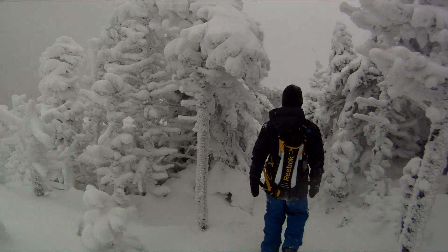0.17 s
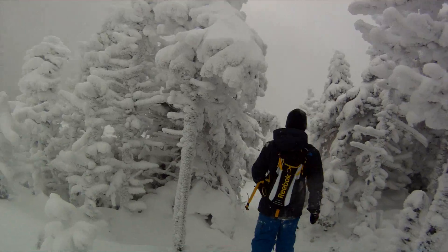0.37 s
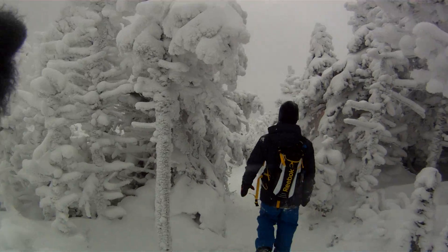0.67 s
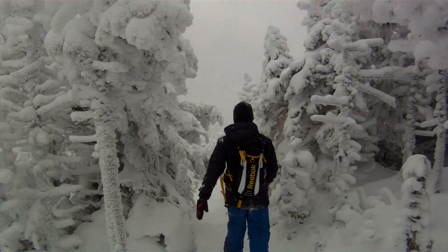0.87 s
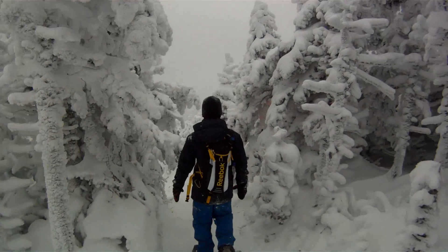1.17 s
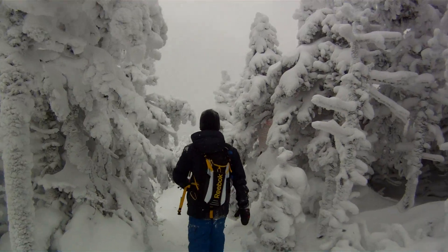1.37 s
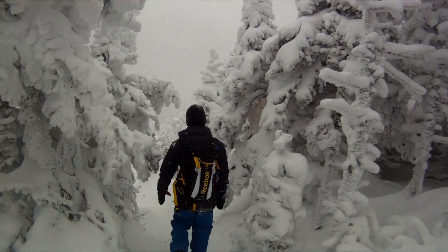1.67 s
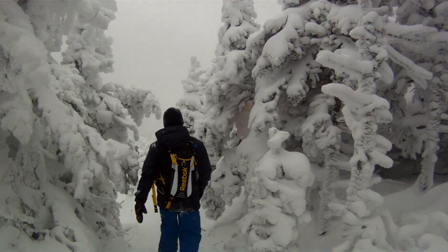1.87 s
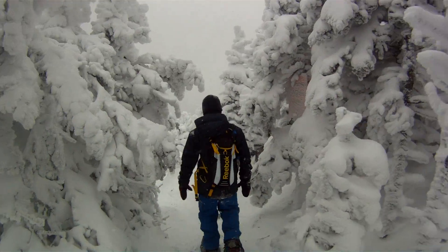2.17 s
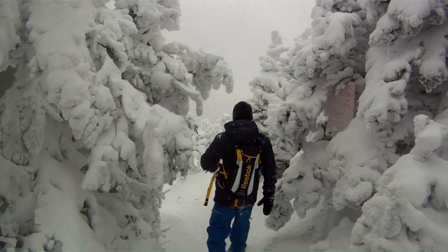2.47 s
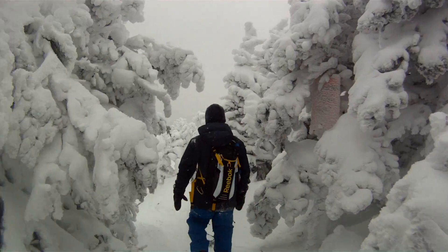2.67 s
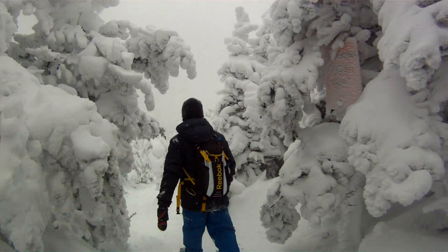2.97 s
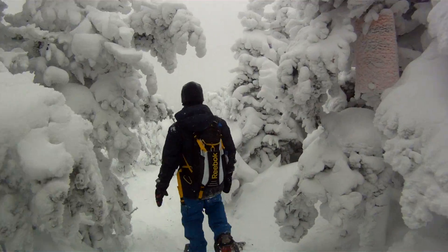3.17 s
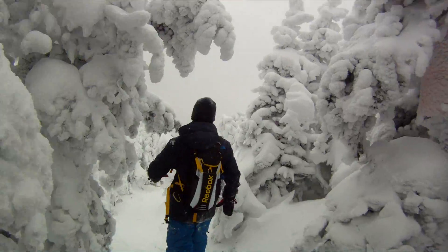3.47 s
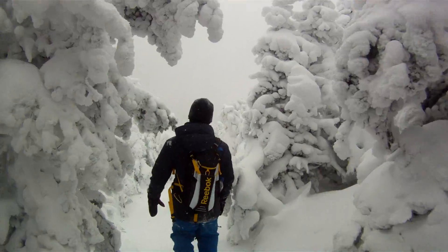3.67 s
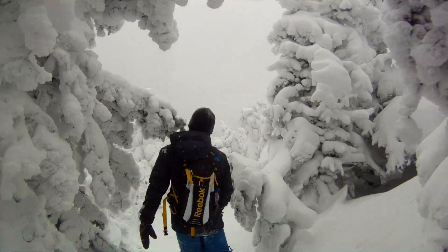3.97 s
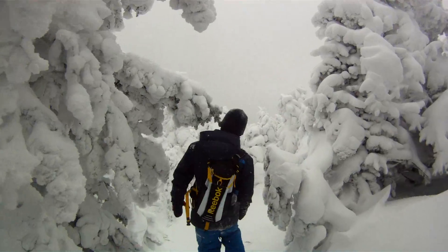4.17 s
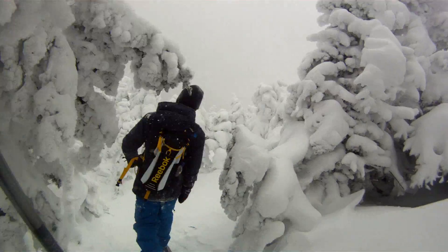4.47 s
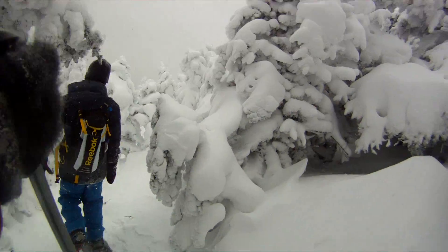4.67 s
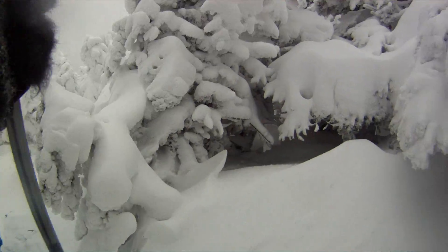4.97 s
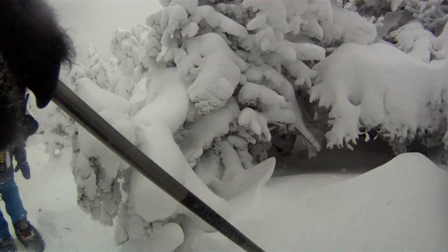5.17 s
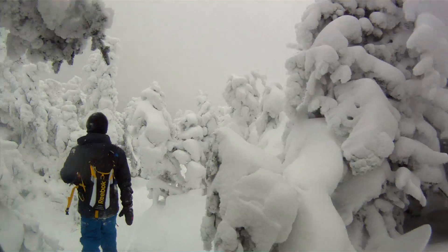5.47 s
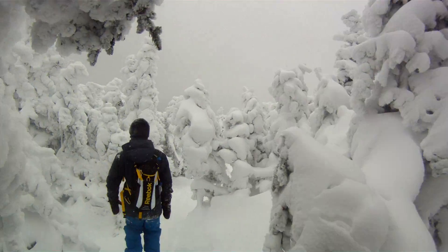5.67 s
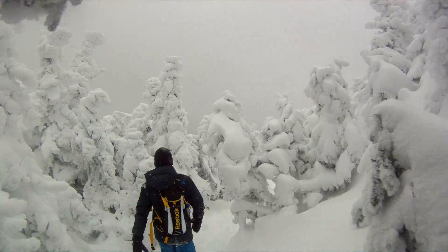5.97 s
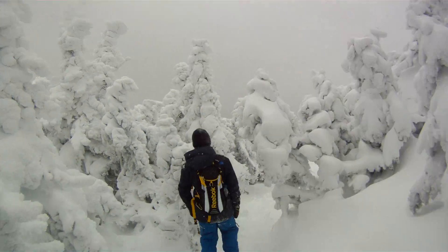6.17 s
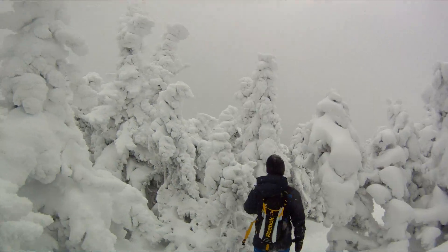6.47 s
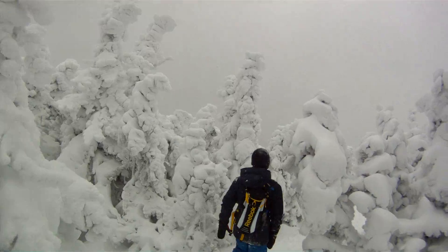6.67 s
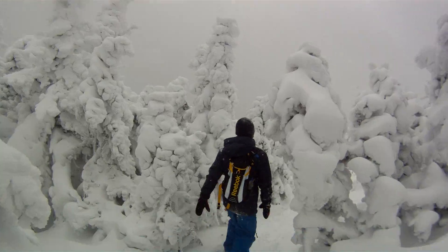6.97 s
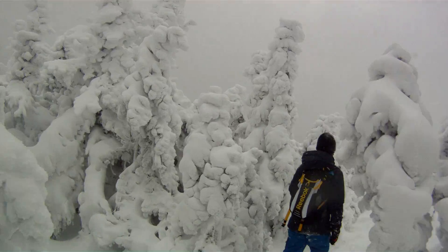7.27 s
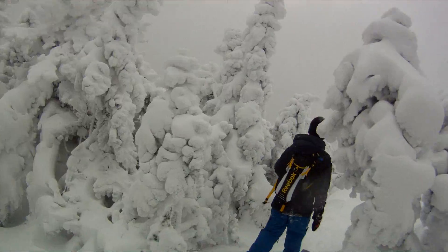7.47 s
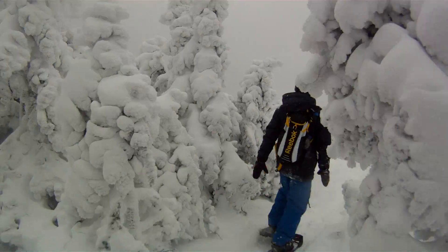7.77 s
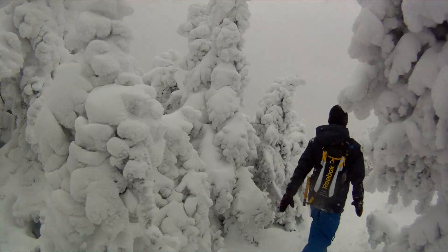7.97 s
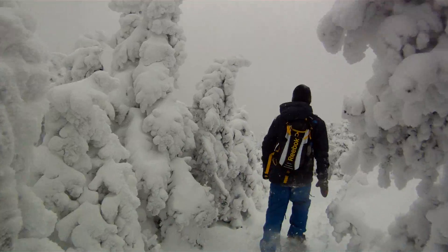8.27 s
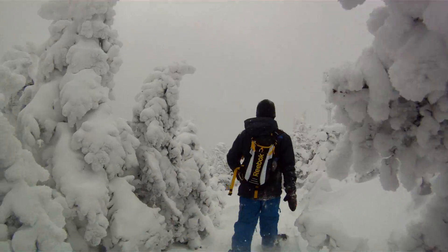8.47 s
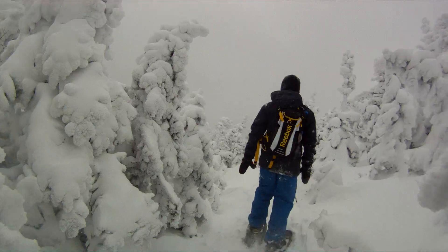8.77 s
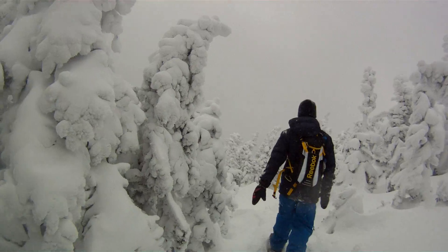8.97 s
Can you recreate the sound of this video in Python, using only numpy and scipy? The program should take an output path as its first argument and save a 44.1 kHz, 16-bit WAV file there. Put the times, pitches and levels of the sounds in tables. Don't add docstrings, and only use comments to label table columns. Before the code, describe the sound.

Outdoors on a snowy trail, a walker's snowshoes crush snow, break crusts and scrape between footfalls. A loose buckle rattles quickly early on, a hard crack comes near the middle, a sleeve rubs low, and straps squeak faintly. Near the end, knocks and crunches bunch up. The sound is mono, close and dry, coloured by a plastic case, with gritty low-quality treble and low body rumble.

```python
import sys
import numpy as np
from scipy import signal
from scipy.fft import rfft, irfft, next_fast_len
from scipy.io import wavfile
from scipy.ndimage import uniform_filter1d

SR = 44100
rng = np.random.default_rng(int(sys.argv[2]) if len(sys.argv) > 2 else 0)


def unload_wav(signal):
    wavfile.write(
        sys.argv[1],
        SR,
        np.round(np.clip(np.atleast_2d(signal).T, -1, 1) * 32767).astype(np.int16),
    )


def linear_from_db(decibels):
    return 10 ** (np.asarray(decibels, float) / 20)


N = 401744


def evened(x):
    return x / np.sqrt(np.mean(x ** 2) + 1e-20)


def peaked(x):
    return x / (abs(x).max() + 1e-12)


def colour(x, points):
    size = next_fast_len(len(x))
    point_hz, point_db = np.transpose(points)
    hz = np.fft.rfftfreq(size, 1 / SR)
    gain = linear_from_db(np.interp(np.log(hz + 1), np.log(point_hz + 1), point_db))
    return irfft(rfft(x, size) * gain, size)[:len(x)]


def hump(hz, width):
    return [(hz / (1 + width), -20), (hz, 0), (hz * (1 + width), -20)]


def add(mix, start_s, sound):
    part = mix[round(start_s * SR):][:len(sound)]
    part += sound[:len(part)]


def lumps(length_s, depth_db):
    size = max(round(length_s * SR), 2)
    smooth = uniform_filter1d(uniform_filter1d(rng.standard_normal(N), size), size)
    return linear_from_db(depth_db * evened(smooth))


def grains(per_s, spread_db):
    chance, side, luck = rng.random((3, N))
    size = linear_from_db(-spread_db * np.log(luck + 0.029))
    return (chance < per_s / SR) * np.sign(side - 0.5) * size


def swells(rows, column, shape):
    rest_db, rise_db, fall_db, hold = shape
    table = np.array(rows)
    t = np.arange(0, N + 64, 64) / SR
    u = (t - table[:, :1]) / np.maximum(table[:, 1:2], 0.02)
    drop_db = np.maximum(np.maximum(-rise_db * u, fall_db * (u - hold)), 0)
    db = table[:, column, None] - drop_db
    gain = np.sqrt(linear_from_db(rest_db) ** 2 + (linear_from_db(db) ** 2).sum(0))
    return np.interp(np.arange(N) / SR, t, gain)


def bursts(rows, level_db, stretch, rise, rough):
    out = np.zeros(N)
    for (start_s, db, length_s, hz), noise in zip(rows, rng.standard_normal((len(rows), 9000))):
        t = np.arange(min(round(stretch * length_s * SR), 9000)) / SR
        u = t / t[-1]
        tone = np.sqrt(2) * np.sin(2 * np.pi * hz * t + 3 * noise[0])
        grit = evened(colour(noise, hump(hz, 0.63)))[:len(t)]
        sound = peaked(u ** rise * (1 - u) ** 2.6 * (tone + rough * grit))
        add(out, start_s - 0.15 * length_s, linear_from_db(db + level_db) * sound)
    return out


def ring(modes, size=1024):
    t = np.arange(size) / SR
    rows = []
    for k, (hz, width_hz, db) in enumerate(modes):
        decay = width_hz * np.exp(-np.pi * width_hz * t)
        rows.append((-1) ** k * linear_from_db(db) * decay * np.sin(2 * np.pi * hz * t))
    return np.array(rows) * 2 * np.pi / SR


# pitch_hz [Hz], width_hz [Hz], level_db [dB]
HOUSING_MODES = [(1168, 130, -8.5), (1485, 120, -1), (1905, 183, -2), (2120, 247, -4), (2371, 104, -5.5),
                 (2753, 410, -11), (3467, 160, -7.5), (3910, 700, -15.5)]
# pitch_hz [Hz], level_db [dB]
HOUSING_LEAK = [(100, -32), (500, -16.5), (1000, -17), (2500, -29.5), (4000, -31), (5400, -22.5),
                (5900, -27)]


def housed(x):
    return signal.oaconvolve(x, ring(HOUSING_MODES).sum(0))[:len(x)] + colour(x, HOUSING_LEAK)


# top_s [s], length_s [s], crush_db [dB], hiss_db [dB]
FOOTFALLS = [(0.07, 0.24, -45.5, -51.5), (0.46, 0.15, -46, -51.5), (0.99, 0.081, -40.5, -47.5),
             (1.55, 0.14, -44.5, -49.5), (2.03, 0.13, -42.5, -46.5), (2.56, 0.13, -42.5, -50.5),
             (3.11, 0.1, -43, -45), (3.55, 0.13, -43, -50), (4.12, 0.1, -42, -44),
             (4.54, 0.081, -44.5, -50.5), (4.93, 0.17, -40.5, -61), (5.59, 0.11, -43.5, -51),
             (5.99, 0.12, -42.5, -52.5), (6.66, 0.18, -47, -60), (7.11, 0.095, -43.5, -55),
             (7.5, 0.11, -42.5, -48), (7.95, 0.25, -44.5, -54.5), (8.18, 0.079, -39, -42),
             (8.59, 0.19, -45, -55.5)]
# top_s [s], length_s [s], crush_db [dB], hiss_db [dB]
DRAGS = [(0.63, 0.1, -46.5, -50.5), (1.12, 0.35, -49, -51), (1.4, 0.28, -48, -74),
         (1.71, 0.062, -52, -50.5), (2.44, 0.036, -47, -54), (2.8, 0.3, -52.5, -61),
         (3.02, 0.085, -44.5, -48.5), (3.35, 0.044, -50, -56), (3.73, 0.18, -45, -51),
         (3.978, 0.17, -46.5, -52), (4.3, 0.061, -45.5, -47), (4.72, 0.22, -40.5, -69),
         (5.32, 0.085, -45, -71), (5.43, 0.21, -45, -71), (6.167, 0.064, -40.5, -52), (6.4, 0.48, -53, -57),
         (6.82, 0.83, -48.5, -66), (7.73, 0.15, -51, -57), (8.29, 0.061, -41.5, -61),
         (8.83, 0.14, -47, -60)]
# rest_db [dB], rise_db and fall_db [dB a length], hold [lengths]
CRUSH_SWELL = (-54.5, 12.5, 6.5, -0.12)
HISS_SWELL = (-65, 18, 10, -0.1)
# pitch_hz [Hz], level_db [dB]
HISS_COLOUR = [(1800, -52), (2600, -14), (3500, -29), (4800, 17.5), (5600, 16), (6200, -16)]


def snow():
    crush = swells(FOOTFALLS + DRAGS, column=2, shape=CRUSH_SWELL)
    hiss = swells(FOOTFALLS + DRAGS, column=3, shape=HISS_SWELL)
    load = evened(crush) ** 0.5
    clumps = lumps(0.009, 2.1)

    breaks = np.zeros(N)
    for hz, db in [(1250, -2.0), (1550, -2.0), (1950, -1.5), (2400, -4.0)]:
        breaks += linear_from_db(db) * colour(evened(grains(700, 2.95)) * lumps(0.0043, 2.54), hump(hz, 0.94))
    wash = evened(colour(rng.standard_normal(N), [(2200, -7), (3200, -11.5)]))
    breaks = load * clumps * evened(breaks) + 0.5 * clumps ** 0.45 * wash

    fizz = np.zeros(N)
    for hz in (2940, 3750, 4650, 4970):
        fizz += colour(evened(grains(900, 7.0)) * lumps(0.016, 1.8), hump(hz, 0.46))
    fizz = evened(fizz) + 0.49 * evened(colour(rng.standard_normal(N), HISS_COLOUR))

    crackle = colour(grains(170, 4.6) * clumps, [(500, -21), (1400, -10), (2800, -3.0), (5500, 9.0)])
    out = linear_from_db(-2.5) * crush * evened(housed(breaks))
    out += linear_from_db(-2.0) * hiss * evened(housed(fizz * clumps))
    return out + linear_from_db(-5.5) * hiss * load * evened(housed(crackle))


# first_db [dB], lost_db [dB a tap], rebound_db [dB], length_s [s], hiss_db [dB]
BUCKLE = (-26, -1.23, -6, 0, -25)


def buckle_taps():
    first_s, gap_s, rebound_s = 2.7095, 0.0366, 0.0155
    first_db, lost_db, rebound_db, length_s, hiss_db = BUCKLE
    taps = []
    for k in range(7):
        for j in range(2):
            start_s = first_s + k * gap_s + j * rebound_s
            taps.append((start_s, first_db + k * lost_db + j * rebound_db, length_s, hiss_db))
    return taps


# start_s [s], peak_db [dB], length_s [s], hiss_db [dB against the peak]
THICK_CRUSTS = [(0.572, -32, 0.008, -7), (0.848, -32, 0.015, -13), (0.956, -29.5, 0.018, -11),
                (1.405, -26.5, 0.018, -25), (1.461, -26, 0.018, -26), (1.471, -23, 0.039, -24),
                (1.903, -29, 0.0093, -21), (2.07, -25.5, 0.0054, -13), (2.44, -36.5, 0.0079, -0.5),
                (2.57, -26, 0.013, -13), (3.006, -27, 0.011, -14), (3.159, -28, 0.014, -14),
                (3.463, -32, 0.014, -17), (3.545, -25.5, 0.015, -9), (3.938, -12.5, 0.021, -15),
                (3.976, -25.5, 0.0098, -9), (4.184, -22, 0.0077, -17), (4.214, -20.5, 0.0067, -16),
                (4.753, -28, 0.029, -14), (5.051, -22.5, 0.0035, -15), (5.884, -34.5, 0.022, -17),
                (6.217, -29.5, 0.011, -16), (7.521, -28, 0.0024, -6), (7.933, -27, 0.027, -13),
                (8.794, -28.5, 0.0047, -9)]
THIN_CRUSTS = [(1.379, -32.5, 0.01, -11), (1.981, -28, 0.011, -7), (2.04, -35, 0.0065, -8),
               (2.523, -28, 0.0036, -6.5), (2.691, -25, 0.011, -22), (3.517, -32.5, 0.026, -8.5),
               (3.955, -22, 0.0093, -19), (4.047, -26.5, 0.0085, -8), (4.29, -30, 0.04, -9),
               (4.813, -34, .0085, -28), (4.974, -26, 0.063, -18), (5.555, -28, 0.0091, -20),
               (6.674, -27, 0.039, -24), (6.851, -28.5, 0.014, -19), (7.475, -26, 0.031, -7),
               (7.721, -34, 0.016, -35), (7.889, -29.5, 0.019, -14.5), (8.145, -25, .0049, -7.5),
               (8.179, -26, 0.013, -8), (8.2085, -29, 0.005, -20), (8.242, -37, .0098, -19),
               (8.276, -20.5, 0.029, -20), (8.461, -26.5, 0.0089, -40), (8.648, -28.5, 0.0067, -10),
               (8.98, -34.5, 0.014, -9.5)]
ICY_FLAKES = [
    (1.549, -29.5, 0.031, -11),
    (1.601, -33, 0.034, -6),
    (4.129, -29, 0.0077, -10),
    (5.97, -19.5, 0.025, -13),
    (6.02, -27, 0.014, -28),
    (6.43, -29, 0.023, -19),
    (6.809, -31, 0.029, -9),
    (7.154, -37.5, .036, -9),
    (8.381, -28.5, 0.046, -19),
]
CLODS = [
    (8.303, -20.5, 0.017, -21),
]


def crunches():
    kinds = [(1530, THICK_CRUSTS), (1910, THIN_CRUSTS), (2460, ICY_FLAKES),
             (1710, buckle_taps()), (1120, CLODS)]
    rows = [(hz, *row) for hz, table in kinds for row in table]
    out, t = np.zeros(N), np.arange(4000) / SR
    noise = rng.standard_normal((len(rows), 2, 4000))
    for (hz, start_s, db, length_s, hiss_db), (grit, air) in zip(rows, noise):
        u = t / max(length_s, 0.001)
        shape = (1 - np.exp(-u / 0.15)) * np.exp(-3 * u)
        body = colour(grit, hump(hz, 0.54)) * shape
        fizz_hz = 3200 * (1 + 0.18 * np.tanh(air[0]))
        fizz = colour(air, hump(fizz_hz, 1.0)) * shape
        sound = peaked(housed(body)) + linear_from_db(hiss_db + 7.5) * peaked(housed(fizz))
        add(out, start_s - 0.0016, linear_from_db(db - 5.0) * sound)
    return out


# start_s [s], peak_db [dB], length_s [s], pitch_hz [Hz]
SNAPS = [(0.0752, -34, 0.022, 1520), (0.4682, -34.5, 0.019, 1505), (0.785, -40, 0.012, 1450),
         (0.9571, -30.5, 0.014, 1910), (1.4832, -33, 0.015, 1980), (1.9762, -32, 0.018, 1964),
         (2.038, -32, 0.0062, 1970), (2.6925, -30, 0.015, 1540), (3.5645, -34, 0.0063, 1510),
         (3.9587, -23, 0.0063, 2060), (3.9744, -29, 0.0073, 2030), (3.9929, -34, 0.019, 1480),
         (4.1404, -31, 0.028, 2056), (4.6585, -34, 0.0087, 1870), (4.708, -34, 0.0091, 1300),
         (4.7186, -33, 0.035, 1896), (4.7554, -35, 0.011, 1490), (4.863, -33, 0.014, 1920),
         (4.8915, -34, 0.007, 1960), (4.9188, -31, 0.0073, 1950), (4.945, -31, 0.032, 1910),
         (4.977, -26, 0.0076, 1910), (5.0495, -25, 0.0091, 2024), (5.3106, -33, 0.0039, 1880),
         (5.3267, -35, 0.017, 1920), (5.5819, -33, 0.0074, 1940), (5.9702, -35, 0.022, 1520),
         (5.9869, -26.5, 0.0081, 1500), (6.1335, -29, 0.009, 1510), (6.2211, -31, 0.0084, 1480),
         (6.6765, -30, 0.027, 1948), (7.1304, -31, 0.008, 1910), (7.5196, -30, 0.009, 1940),
         (7.7224, -29, 0.019, 2000), (7.9336, -31, 0.017, 1520), (8.1601, -32, 0.014, 2000),
         (8.1787, -35, 0.014, 1430), (8.2039, -35, 0.02, 1520), (8.2397, -31, 0.007, 1400),
         (8.2835, -28, 0.012, 1490), (8.295, -35, 0.007, 1890), (8.3707, -32, 0.01, 2020)]
# start_s [s], peak_db [dB], length_s [s], pitch_hz [Hz]
CHIPS = [(0.3001, -33, 0.01, 2660), (0.57, -38, 0.014, 2500), (1.5452, -35, 0.01, 2700),
         (2.0298, -38, 0.008, 3430), (2.5211, -38, 0.01, 4890), (2.5682, -36, 0.017, 2560),
         (3.5225, -34, 0.013, 3380), (3.5441, -35, 0.009, 2420), (3.7128, -31, 0.014, 2710),
         (3.7237, -35, 0.007, 2700), (4.0896, -33, 0.0085, 3380), (4.0957, -31, 0.01, 2600),
         (4.1442, -35, 0.014, 3610), (4.2091, -34, 0.011, 2730), (4.7544, -30, 0.007, 2610),
         (4.9699, -33, 0.02, 2580), (6.004, -32, 0.01, 2650), (6.0368, -36, 0.013, 2600),
         (6.0519, -34, 0.0077, 2630), (6.0827, -33, 0.018, 2470), (6.1541, -34, 0.009, 2600),
         (6.2202, -30.5, 0.009, 2660), (6.359, -35.5, 0.012, 2470), (7.4745, -32, 0.011, 3600),
         (7.506, -38, 0.012, 3430), (7.5276, -28, 0.012, 2600), (7.9332, -29, 0.0042, 2610),
         (8.1656, -30, 0.014, 3510), (8.2143, -24, 0.0073, 2990), (8.2776, -34, 0.0055, 2590),
         (8.8454, -36, 0.023, 3487)]


def crystals():
    snaps = bursts(SNAPS, -2.0, stretch=1.13, rise=1.0, rough=0.68)
    return snaps + bursts(CHIPS, -1.2, stretch=1.26, rise=0.96, rough=1.0)


# start_s [s], main_db [dB], then against it thud_db, second_db, fourth_db [dB]
KNOCKS = [(0.2266, -18.5, -18.5, 1.5, -5), (0.3025, -23, -10.5, 0.5, -7.5), (3.013, -30.5, -16, 7, -6),
          (3.1085, -21, -16, 4.5, -29), (3.5741, -27.5, -11, -1, -9), (3.6392, -19.5, -17, 4.5, -4),
          (4.0985, -29, -9, 2, -25), (4.5383, -16, -15, -1, -8), (4.6382, -21, -15, 4, -3.5),
          (6.156, -31.5, -42, 8, -5), (6.768, -15.5, -12.5, -14, -15), (7.53, -26.5, -12.5, -2, -12),
          (7.661, -21, -9.5, -10, -8.5), (7.736, -36.5, -5, -10, -1.5), (7.9543, -14, -14, -11, -22),
          (8.2669, -23.5, -9.5, 5.5, -11), (8.3072, -32, -11, 2, -25), (8.3601, -13.5, -10.5, -10.5, -22),
          (8.5981, -12, -13, -3, -13)]
# main pitch_hz [Hz], third_db [dB against the main mode]
LANDINGS = [(1425, -8.5), (1430, -7), (1470, -8), (1425, -18), (1455, -12), (1472, -13), (1440, -12),
            (1475, -12), (1470, -12), (1455, -10), (1483, -11), (1450, -7), (1430, -25), (1460, -16),
            (1505, -11), (1420, -18), (1460, -12), (1426, -14), (1433, -13)]
# pitch_hz [Hz], width_hz [Hz], level_db [dB]
SHELL_MODES = [(270, 260, 0), (540, 320, -1)]
# pitch_hz [Hz], top_s [s until the swell tops]
AIR_MODES = [(1455, 0.0025), (1925, 0.0014), (2700, 0.0014), (3460, 0.0014), (4070, 0.0012)]


def knocks():
    out, t = np.zeros(N), np.arange(1024) / SR
    push = -np.sin(np.pi * np.clip(t / 0.00056, 0, 1)) ** 2
    shell = np.zeros(1024)
    for hz, width_hz, db in SHELL_MODES:
        shell += linear_from_db(db) * np.exp(-np.pi * width_hz * t) * np.cos(2 * np.pi * hz * t)
    thud = peaked(np.convolve(push, shell)[:1024])

    mode_hz, top_s = np.transpose(AIR_MODES)[:, :, None]
    swell = t / top_s * np.exp(0.5 - (t / top_s) ** 2 / 2)
    swell += 0.12 * (1 - np.exp(-t / top_s)) * np.exp(-t / 0.0062)
    chance = rng.standard_normal((len(KNOCKS), 10))
    for knock, noise, (main_hz, third_db) in zip(KNOCKS, chance, LANDINGS):
        start_s, db, thud_db, second_db, fourth_db = knock
        detuned = mode_hz * (1 + 0.01 * noise[5:, None])
        pitch = np.vstack([[main_hz], detuned[1:]])
        phase = noise[:5, None] * [[0.08], [0.3], [0.4], [0.4], [0.4]]
        levels = linear_from_db([0.3, second_db, third_db, fourth_db, -20])
        air = levels @ (swell * np.sin(2 * np.pi * (pitch * t + phase)))
        sound = linear_from_db(thud_db + 10.5) * push + linear_from_db(thud_db + 10) * thud + air
        add(out, start_s - 0.0004, linear_from_db(db) * sound)
    return colour(out, [(70, -6), (220, 0)])


# start_s [s], peak_db [dB]
TICKS = [(0.2253, -37), (0.302, -38), (3.0076, -32.5), (3.108, -39), (3.463, -35.5), (3.639, -32.5),
         (4.5347, -35), (4.558, -44), (4.6376, -35), (6.171, -40), (6.767, -26), (7.5288, -35.5),
         (7.661, -36), (7.9525, -40), (8.2666, -29.5), (8.297, -32), (8.3024, -33), (8.311, -31.5),
         (8.359, -28), (8.597, -36)]


def ticks():
    out, t = np.zeros(N), np.arange(400) / SR
    for (start_s, db), noise in zip(TICKS, rng.standard_normal((len(TICKS), 400))):
        spit = colour(noise, hump(5030, 1.0)) * np.exp(-t / 0.0027)
        add(out, start_s - 0.0003, linear_from_db(db + 5.0) * peaked(spit))
    return out


# start_s [s], peak_db [dB], length_s [s],
# pitch_hz [Hz]
SCUFFS = [(1.406, -42, 0.016, 440), (1.9797, -38, 0.011, 420), (3.108, -29, 0.007, 1160),
          (3.125, -39, 0.009, 504), (3.5339, -41, 0.0087, 810), (3.8683, -43, 0.014, 450),
          (4.9566, -48, 0.036, 794), (6.2193, -42, 0.0098, 850), (6.7675, -23, 0.0069, 1156),
          (7.9538, -23, 0.0071, 1150), (8.142, -38, 0.011, 1050), (8.25, -33, 0.03, 200),
          (8.3, -32, 0.017, 250), (8.6679, -44, 0.02, 370)]
# start_s [s], peak_db [dB], length_s [s], pitch_hz [Hz]
HEAVES = [(1.1228, -40, 0.053, 29), (1.3852, -39, 0.053, 36), (2.5751, -31, 0.1, 29),
          (3.7528, -43, 0.12, 121), (3.989, -43, 0.12, 29), (4.5088, -39, 0.13, 29),
          (4.6569, -41, 0.035, 98), (4.7038, -37, 0.085, 102.4), (4.9824, -41, 0.04, 97.5),
          (5.5506, -41.5, 0.072, 85), (5.6313, -39, 0.061, 36), (5.9259, -40, 0.035, 101),
          (7.0751, -35, 0.12, 32.3), (7.5019, -38, 0.081, 34)]


def scuffs_and_heaves():
    scuffs = bursts(SCUFFS, -0.99, stretch=1.2, rise=0.89, rough=0.63)
    return scuffs + bursts(HEAVES, -2.8, stretch=1.3, rise=1.6, rough=0.33)


def stick_slip(rows, width):
    out = np.zeros(N)
    for (start_s, length_s, hz, db), noise in zip(rows, rng.standard_normal((len(rows), 9000))):
        narrow = [(hz * 0.8, -50), (hz * (1 - width), -12), (hz, 0), (hz * (1 + width), -12), (hz * 1.5, -50)]
        band = evened(colour(noise, narrow))
        size = min(round(length_s * SR), 9000)
        waver = 1 + 0.01 * evened(uniform_filter1d(noise, 300))
        tone = np.sin(2 * np.pi * hz * np.cumsum(waver) / SR)
        add(out, start_s, linear_from_db(db) * (0.5 * band + tone)[:size] * signal.windows.tukey(size, 0.2))
    return out


# start_s [s], length_s [s], pitch_hz [Hz], level_db [dB]
SQUEAKS = [
    (0.79, 0.06, 2530, -60),
    (6.342, 0.06, 2440, -53),
    (7.711, 0.03, 2030, -37),
    (8.813, 0.03, 3480, -56),
]
# start_s [s], length_s [s], pitch_hz [Hz], level_db [dB]
WHISTLES = [
    (0.88, 0.055, 2520, -58),
    (4.285, 0.04, 3520, -52),
    (6.347, 0.055, 2790, -54),
    (6.361, 0.016, 1550, -46),
    (8.301, .018, 740, -47),
    (8.868, 0.06, 3500, -62),
]


def squeaks():
    return stick_slip(SQUEAKS, 0.04) + stick_slip(WHISTLES, 0.024)


# start_s [s], length_s [s], pitch_hz [Hz], level_db [dB]
SLEEVE = [
    (4.518, 0.63, 275, -51.5),
]


def sleeve():
    out = np.zeros(N)
    for start_s, length_s, hz, db in SLEEVE:
        size = round(length_s * SR)
        rub = evened(colour(rng.standard_normal(SR), [(hz / 4, -4), (hz, 0), (hz * 1.25, -25)]))
        add(out, start_s, linear_from_db(db) * rub[:size] * signal.windows.tukey(size, 0.3))
    return out


# top_s [s], length_s [s], sway_db [dB], rumble_db [dB]
BOUNCES = [(0.0, 0.14, -45, -55.5), (0.47, 0.44, -51, -56), (0.99, 0.13, -45.5, -53),
           (1.54, 0.45, -52, -60), (2.02, 0.13, -40, -51.5), (2.5, 0.24, -52, -66), (3.07, 0.099, -39, -47),
           (3.59, 0.14, -38.5, -51), (3.82, 0.13, -64, -52), (4.07, 0.12, -44.5, -50),
           (4.6, 0.069, -43, -50), (4.84, 0.58, -56, -51.5), (5.35, 0.066, -73, -58),
           (5.59, 0.27, -53, -52), (6.11, 0.21, -49, -57), (6.65, 0.14, -48.5, -61),
           (7.12, 0.086, -40.5, -51), (7.53, 0.16, -48, -54.5), (7.94, 0.1, -44.5, -50.5),
           (8.15, 0.055, -50, -51), (8.3, 0.076, -35, -42), (8.66, 0.096, -37.5, -45),
           (8.89, 0.085, -58, -52), (9.11, 0.043, -40.5, -77)]
# rest_db [dB], rise_db and fall_db [dB a length], hold [lengths]
SWAY_SWELL = (-62, 17.5, 20, 0.11)
RUMBLE_SWELL = (-61, 11, 18, 0.01)
# pitch_hz [Hz], level_db [dB]
SWAY_COLOUR = [(15, 2.5), (25, 2), (45, 1), (70, -8.5), (120, -44)]
JOLT_COLOUR = [(35, -42), (60, -10), (100, 0.5), (150, -5.5), (280, -11), (450, -34)]
RUB_COLOUR = [(200, -21), (350, -1), (600, -2), (950, -3), (1300, -33)]
# start_s [s], peak_db [dB], pitch_hz [Hz], length_s [s]
THUMPS = [(0.452, -38, 100, 0.039), (0.687, -34, 78, 0.015), (1.556, -35, 117, 0.028),
          (1.867, -38.5, 116, 0.027), (1.975, -29, 113, 0.025), (2.561, -34, 136, 0.021),
          (2.788, -34.5, 90.5, 0.032), (2.824, -35.5, 98, 0.032), (2.918, -39.5, 119, 0.03),
          (3.072, -31, 60.5, 0.018), (3.565, -33, 61, 0.015), (3.75, -43.5, 96.9, 0.041),
          (4.078, -52, 119, 0.024), (4.861, -37.5, 121, 0.038), (5.638, -41, 93, 0.03),
          (5.971, -33.5, 114, 0.027), (6.026, -28.5, 102, 0.023), (6.191, -35.5, 68.4, 0.046),
          (6.684, -35, 102, 0.025), (7.52, -40, 117, 0.06), (8.135, -33, 79, 0.037),
          (8.259, -25, 103, 0.019), (8.49, -37, 113, 0.019)]


def mount():
    sway = swells(BOUNCES, column=2, shape=SWAY_SWELL)
    rumble = swells(BOUNCES, column=3, shape=RUMBLE_SWELL)
    crush = swells(FOOTFALLS + DRAGS, column=2, shape=CRUSH_SWELL)
    sway_noise, jolt_noise, rub_noise = rng.standard_normal((3, N))
    bumps = lumps(0.013, 3.7)

    out = linear_from_db(1.04) * sway * evened(colour(sway_noise, SWAY_COLOUR))
    out += linear_from_db(-1.0) * (rumble + 0.093 * sway) * evened(colour(jolt_noise, JOLT_COLOUR) * bumps)
    rubs = evened(colour(rub_noise, RUB_COLOUR) * bumps ** 0.5 * lumps(0.0071, 3.9))
    out += linear_from_db(-13.5) * np.sqrt(rumble * crush) * rubs

    for (start_s, db, hz, length_s), phase in zip(THUMPS, rng.random(len(THUMPS))):
        u = np.arange(round(length_s * SR)) / SR / length_s
        sag = hz * length_s * (1.133 * u - 0.15 * u ** 2)
        thump = u ** 1.22 * (1 - u) ** 3.7 * np.sin(2 * np.pi * (sag + phase))
        add(out, start_s + 0.0041, linear_from_db(db - 1.0) * peaked(thump))
    return out


def scene():
    steps = snow() + crunches() + crystals()
    blows = knocks() + ticks() + scuffs_and_heaves()
    return (steps + blows + squeaks() + sleeve() + mount())[None]


# pitch_hz [Hz], level_db [dB]
TREBLE_TONE = [(5850, 1.5), (6000, -3.5), (6150, 1.5), (15000, 1.5), (15250, 1), (15400, -20),
               (15900, -20), (16600, -22)]


def converter(x):
    slow = signal.resample_poly(x, 40, 147, window=("kaiser", 8))
    held = signal.resample_poly(np.repeat(slow, 4), 147, 160)[:N]
    return colour(held, TREBLE_TONE)


def low_pass(x):
    return signal.sosfilt(signal.butter(12, 16490, fs=SR, output="sos"), x)


def record(dry):
    mix = converter(dry[0])[None]
    return low_pass(mix)


dry = scene()
out = record(dry)
unload_wav(out)
```